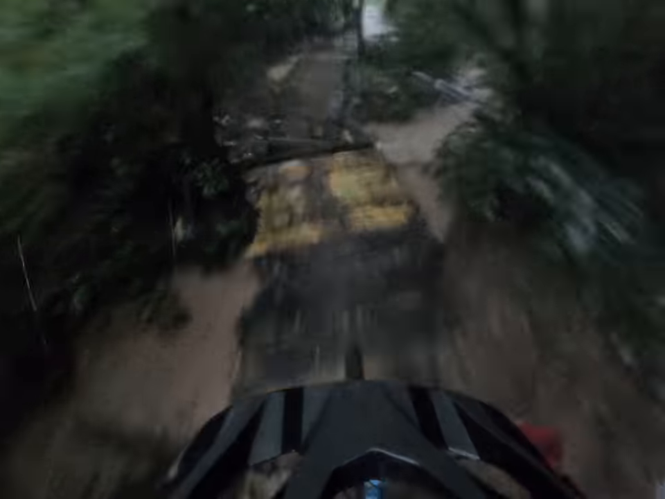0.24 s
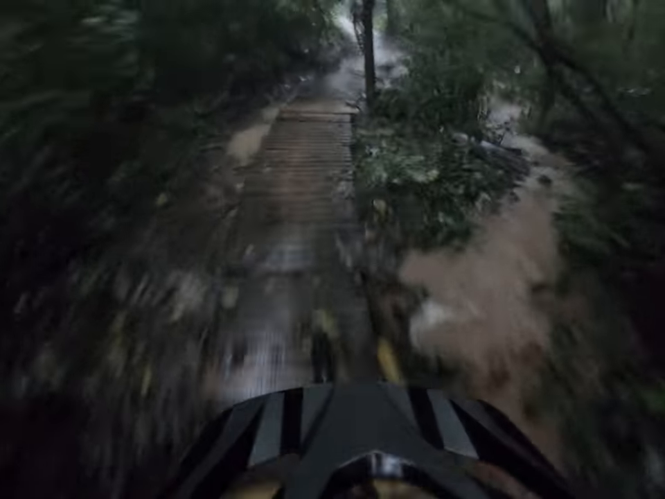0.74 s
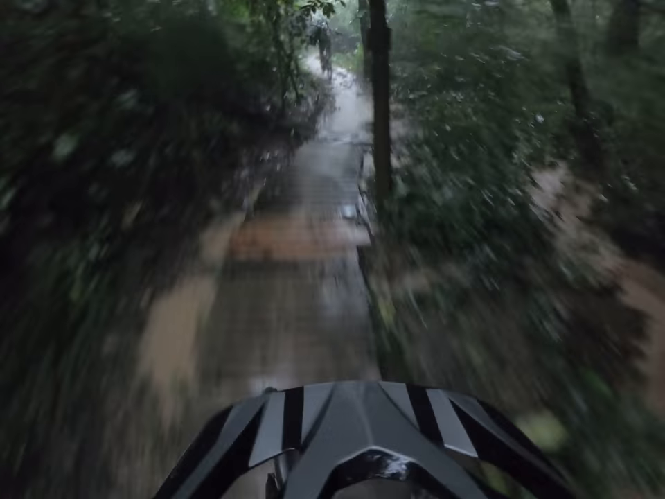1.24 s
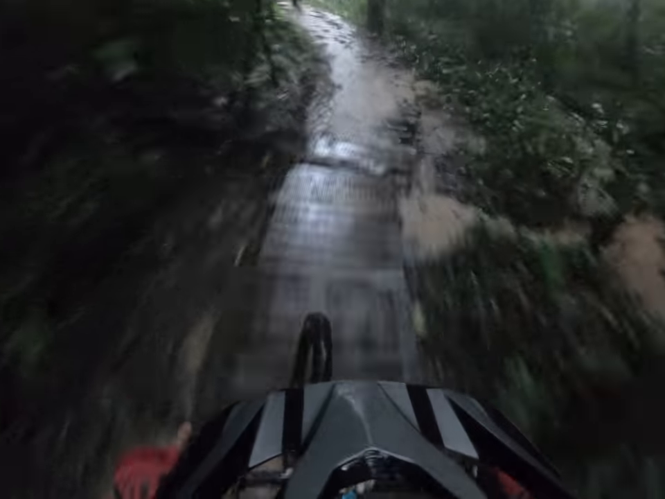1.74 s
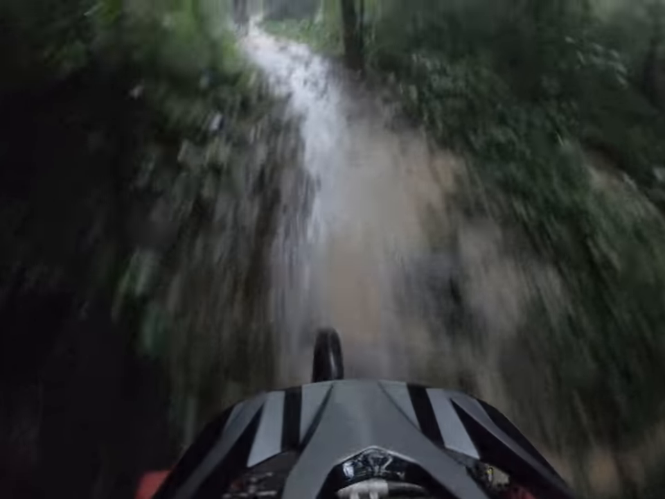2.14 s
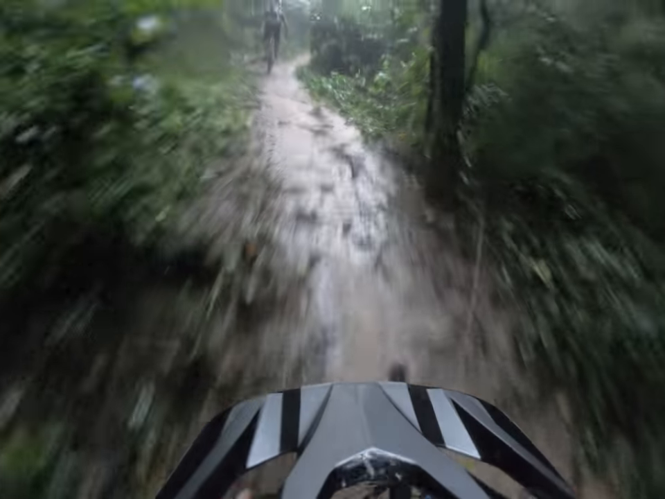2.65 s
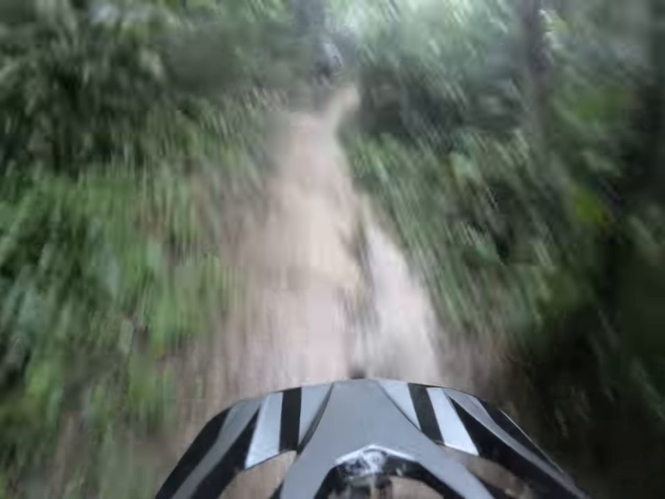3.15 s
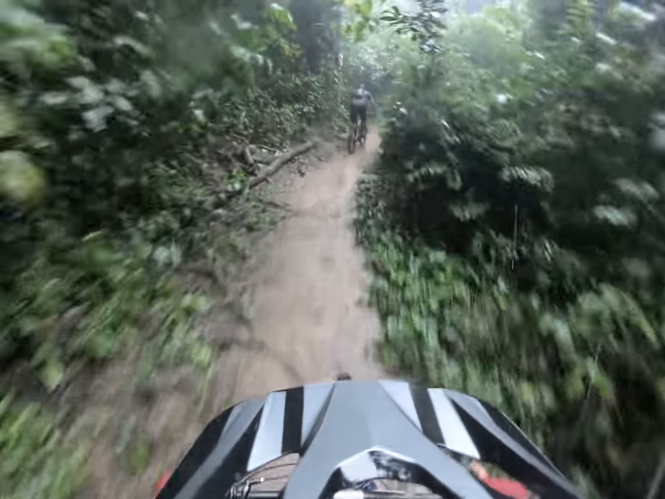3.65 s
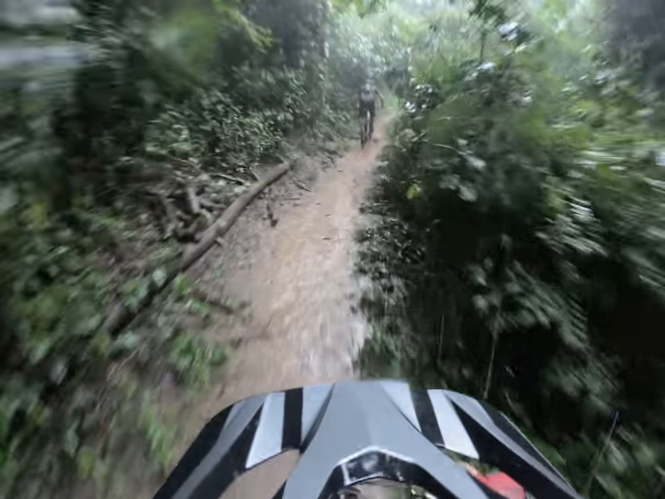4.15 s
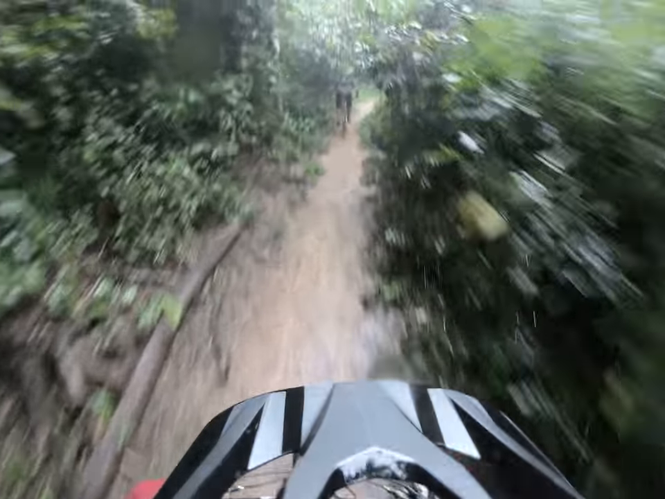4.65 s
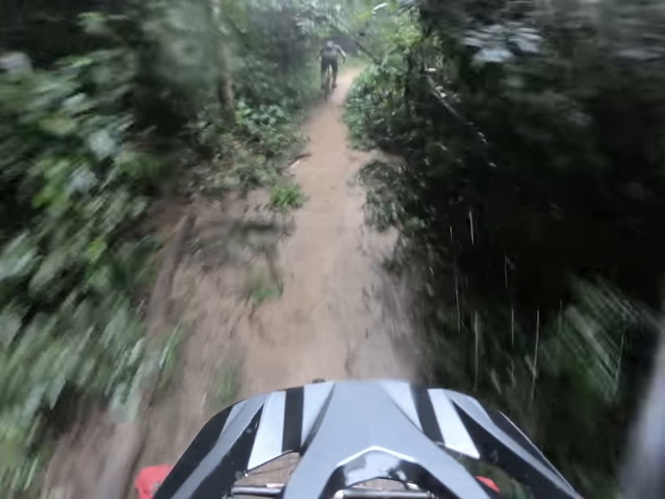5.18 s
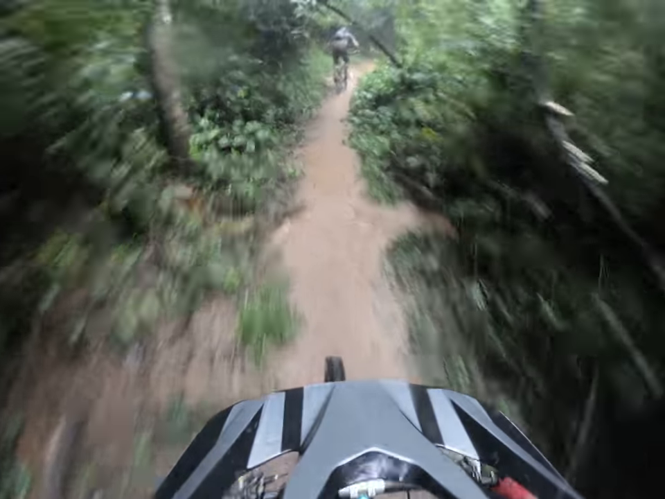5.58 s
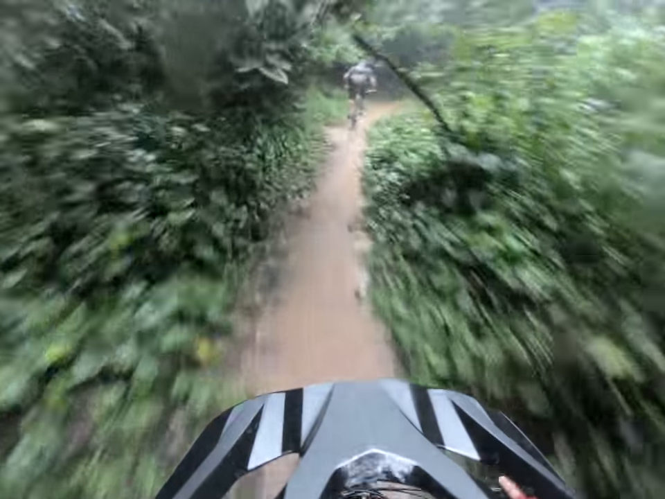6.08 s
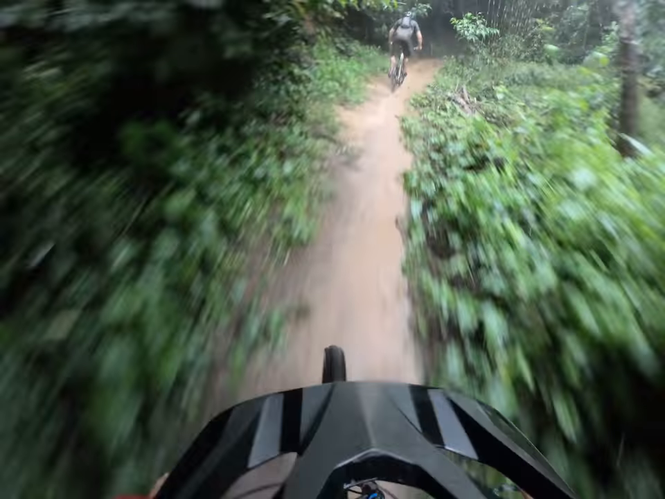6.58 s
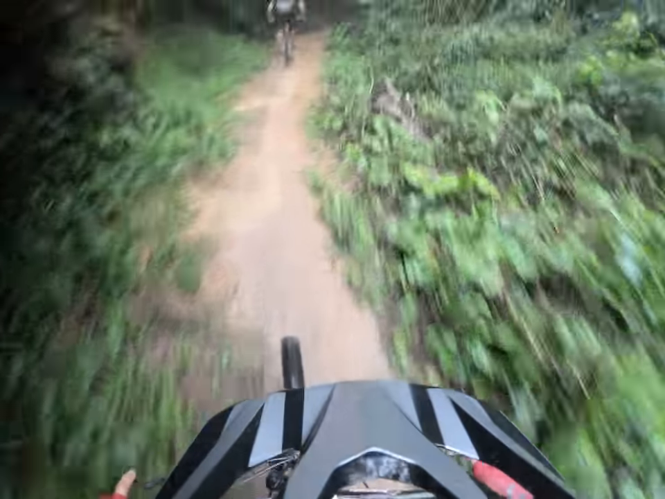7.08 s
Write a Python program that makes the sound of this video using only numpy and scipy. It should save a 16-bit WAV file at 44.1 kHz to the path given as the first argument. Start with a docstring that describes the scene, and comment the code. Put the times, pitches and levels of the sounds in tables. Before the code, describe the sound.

Rain and mud spray patter hard and close on a sealed camera housing while a bicycle thumps and knocks along a wet forest trail.

```python
"""A forest trail in a downpour, heard by a sealed helmet camera on a ridden bicycle.
Drops and mud spray tap the housing: rough noise pushes ring its damped modes, filtered bursts crack.
Bumps, knocks and brief high tones are decaying sines; wind is noise in low helmet and mount resonances.
Far rain hisses as fine ticks over a noise wash, and a wet part of the bike squeaks in wavering sines."""
import sys
import numpy as np
from scipy import signal
from scipy.fft import rfft, irfft
from scipy.io import wavfile
from scipy.ndimage import uniform_filter1d, map_coordinates

SR = 44100
rng = np.random.default_rng(int(sys.argv[2]) if len(sys.argv) > 2 else 0)


def wav_out(sig):
    """Save sig, one row per channel (or a flat mono array), as 16-bit PCM at SR to the path in sys.argv[1]."""
    wavfile.write(sys.argv[1], SR, np.round(np.clip(np.atleast_2d(sig).T, -1, 1) * 32767).astype(np.int16))


N = 322812
T = np.arange(N) / SR
TAP = np.arange(1024) / SR  # clock of one short sound, s

# Spray thickness, which also steers the far rain: (time [s], level before boost and drop size [dB])
SPRAY_LEVEL = [(0.0, -47.5), (0.85, -42), (1.24, -50), (1.69, -41.5), (2.06, -52), (2.91, -50.5),
               (3.28, -46.5), (3.83, -48.5), (4.22, -44.5), (4.38, -52), (5.07, -50), (5.71, -40.5),
               (6.01, -41.5), (6.4, -48.5), (6.81, -41), (7.16, -43), (7.32, -40.5)]


def undb(db):
    """Decibels to gain."""
    return 10 ** (np.asarray(db) / 20)


def level(x, db):
    """Scale to an rms level."""
    return x * undb(db) / np.sqrt(np.mean(x ** 2))


def peak(rows):
    """Scale each row to peak 1."""
    return rows / np.abs(rows).max(axis=1, keepdims=True)


def decay(t, t60):
    """Exponential fall of 60 dB in t60."""
    return np.exp(-np.log(1000) * t / t60)


def place(s, rows):
    """Mix one short sound per row in at its time."""
    at = (np.asarray(s) * SR).astype(int)[:, None] + np.arange(rows.shape[1])
    return np.bincount(at.ravel(), rows.ravel(), N + SR)[:N]


def walk(rate):
    """Random levels held 1 / rate s, then slewed twice into a smooth drift; spread near 2."""
    k = int(SR / rate)
    held = np.repeat(rng.standard_normal(N // k + 1), k)
    return 2.84 * uniform_filter1d(uniform_filter1d(held, k), k)[:N]


def band(hz, width_hz):
    """Noise through one resonance twice, rms 1."""
    b, a = signal.iirpeak(hz, hz / width_hz, fs=SR)
    once = signal.lfilter(b, a, rng.standard_normal(N))
    return level(signal.lfilter(b, a, once), 0)


def port(x):
    """Sound through the sealed port: a causal filter from the cepstrum of its log gain."""
    # Colour of the port: (frequency [Hz], gain [dB])
    port_colour = [(88, -32.5), (150, 1.5), (298, -2), (860, -7), (1270, -10.5), (1580, -0.5),
                   (2160, -14.5), (3020, -20), (4130, -13.5), (6490, -30.5), (8540, -40), (11000, -58),
                   (12600, -41.5), (16300, -63)]
    hz, db = np.transpose(port_colour)
    bins_hz = np.arange(1025) * SR / 2048
    gain_db = np.interp(np.log(bins_hz + 1), np.log(hz), db)
    cepstrum = irfft(np.log(undb(gain_db)))
    # folding the cepstrum forward in time makes the filter minimum phase
    cepstrum[1:1024] *= 2
    cepstrum[1025:] = 0
    response = irfft(np.exp(rfft(cepstrum)))
    return signal.fftconvolve(x, response[None], axes=1)[:, :x.shape[1]]


def hiss(ticks_per_s=500, scatter_db=9.0, wash_db=-3, hiss_db=-42.5, follow=0.46):
    """Rain in the leaves: a fine crackle over a wash, louder where the spray is thicker."""
    spray_db = np.interp(T, *np.transpose(SPRAY_LEVEL))
    ticks = (rng.random(N) < ticks_per_s / SR) * undb(scatter_db * rng.standard_normal(N))
    ticks = uniform_filter1d(ticks, size=48) * rng.standard_normal(N)  # each tick lasts about a millisecond
    noise = level(ticks, 0) + undb(wash_db) * rng.standard_normal(N)
    steady = level(port(noise[None])[0], hiss_db)
    swell_db = follow * (spray_db - spray_db.mean()) + .8 * walk(60)
    return steady * undb(swell_db)


def wind():
    """Turbulence buffets the low resonances of helmet and mount, each with its own gusts."""
    # Wind strength: (time [s], helmet shell level before gusts [dB], camera mount level before gusts [dB])
    wind_level = [(0.0, -33.5, -50), (0.51, -31, -46), (1.02, -35, -49.5), (1.57, -33.5, -35.5),
                  (1.89, -31, -69), (2.18, -33, -53), (2.95, -46.5, -66), (3.28, -28, -42),
                  (3.67, -42, -71.5), (4.3, -38, -38.5), (4.45, -38, -53.5), (5.16, -29.5, -49),
                  (5.61, -44, -39.5), (5.99, -38.5, -50), (6.28, -31.5, -52), (6.6, -34.5, -38),
                  (6.85, -33, -41), (7.32, -43, -65)]
    # Helmet shell resonances: (frequency [Hz], width of each filter pass [Hz], level before gusts [dB])
    shell_modes = [(27.6, 9.7, -0.22), (46.8, 36, -1.3)]
    s, shell_db, mount_db = np.transpose(wind_level)
    shell = sum(undb(db + 1.95 * walk(6.8)) * band(hz, width) for hz, width, db in shell_modes)
    shell = undb(np.interp(T, s, shell_db)) * shell
    mount_gusts_db = 6.2 * np.tanh(walk(25))
    mount = undb(np.interp(T, s, mount_db) + mount_gusts_db) * band(hz=144, width_hz=69)
    shell_gusts_db = 4.0 * np.tanh(walk(10))
    return undb(shell_gusts_db) * shell + mount


def squeaks(stutter_db=3):
    """Thin unsteady tones of rubbing metal that waver in pitch, stutter and fade."""
    # Squeaks: (start [s], end [s], centre pitch [Hz], level before stutter [dB])
    squeak_notes = [(1.416, 1.604, 7900, -64.5), (4.24, 4.3, 5250, -70), (5.167, 5.534, 5900, -61.5),
                    (5.17, 5.59, 5020, -62.5)]
    out = 0
    for start, end, hz, db in squeak_notes:
        length = end - start
        gate = np.interp(T, [start, start + 0.043 * length, end - 0.1 * length, end], [0, 1, 1, 0])
        waver = 1 + .003 * walk(30) + .008 * walk(600)  # a slow drift and a rough flutter
        tone = np.sin(2 * np.pi * np.cumsum(hz * waver) / SR)
        tone_db = db + stutter_db * np.tanh(walk(40)) + 4 * walk(300)
        out = out + gate * undb(tone_db) * tone
    return out


def high_tones(t60_s=0.028, rise_s=0.00022):
    """Short high tones near 4 kHz, each at its own pitch, with a quick rise and fade."""
    # High tones: (time [s], peak [dB], pitch [Hz])
    tone_notes = [(0.571, -28.5, 4600), (1.594, -24, 4400), (1.832, -19, 4020), (1.857, -25.5, 4300),
                  (1.974, -26, 4070), (1.984, -15.5, 4350), (2.517, -30, 4100), (3.439, -34, 4100),
                  (4.16, -25, 4030), (4.226, -29, 4050), (4.304, -25, 4050), (6.207, -22.5, 4150)]
    s, db, hz = np.array(tone_notes).T[:, :, None]
    onset = 1 - np.exp(-TAP / rise_s)
    fade = 1 - TAP / TAP[-1]  # a straight fade on top of the decay, ending in silence
    rows = np.sin(2 * np.pi * hz * TAP) * decay(TAP, t60_s) * onset * fade
    return place(s[:, 0], undb(db) * peak(rows))


def bumps():
    """Each jolt rocks the helmet at a low pitch that sags at the onset, and knocks the mount."""
    # Bumps through the helmet: (time [s], peak [dB], settled pitch [Hz], 60 dB decay [s])
    jolts = [(0.217, -13.5, 42.7, 0.026), (0.316, -27, 59.5, 0.45), (0.548, -26, 55.5, 0.45),
             (0.77, -22.5, 58.6, 0.083), (1.49, -10, 56.8, 0.22), (1.82, -12.5, 54.4, 0.21),
             (1.978, -8.5, 46.5, 0.25), (2.639, -21.5, 40.7, 0.12), (3.118, -8.5, 50.5, 0.2),
             (3.278, -14, 45, 0.14), (6.08, -14.5, 59, 0.25), (6.177, -21, 49.4, 0.13),
             (6.245, -16, 46.3, 0.23), (6.365, -18.5, 39, 0.18), (6.948, -10.5, 59.5, 0.15),
             (7.018, -12.5, 42.7, 0.14), (7.272, -15.5, 52.7, 0.13)]
    s, db, hz, t60 = np.array(jolts).T[:, :, None]
    t = np.arange(SR // 2) / SR
    turns = hz * (t + 0.0051 * (1 - np.exp(-t / 0.0026)))
    helmet = np.sin(2 * np.pi * turns)
    mount = 0.31 * np.sin(2 * np.pi * 128 * t) * np.exp(-t / 0.099)
    onset = 1 - np.exp(-t / 0.0035)
    rows = (helmet + mount) * decay(t, t60) * onset
    return place(s[:, 0], undb(db) * peak(rows))


def knocks(cycles=7):
    """A soft blow sets one low shell mode going; it falls 60 dB in a few cycles."""
    # Dull knocks of the helmet shell: (time [s], peak [dB], pitch [Hz])
    blows = [(0.195, -16, 466), (0.969, -22, 312), (1.524, -24.5, 490), (3.118, -17.5, 266),
             (3.435, -21, 276), (3.437, -21, 120), (4.76, -25, 138), (5.544, -26, 156), (5.715, -22, 204),
             (6.518, -21, 358), (6.861, -27.5, 221), (6.941, -20, 350), (7.275, -17.5, 407)]
    s, db, hz = np.array(blows).T[:, :, None]
    turns = hz * np.arange(SR // 10) / SR
    onset = 1 - np.exp(-turns / 0.39)
    rows = np.sin(2 * np.pi * turns) * decay(turns, cycles) * onset
    return place(s[:, 0], undb(db) * peak(rows))


def ring(modes, gain_db, push, scatter_db, top_hz, detune=.04, bend=0.067):
    """A rough push rings modes of random strength; water on the wall shifts and bends their pitch."""
    hz, t60, db = np.transpose(modes)
    shapes = np.exp(np.outer(2j * np.pi * hz - np.log(1000) / t60, TAP)).imag
    # a small soft drop drives the wall over a limited range
    drive = signal.butter(4, [400, top_hz], "band", fs=SR, output="sos")
    shapes = signal.sosfilt(drive, shapes)
    gains = undb(db + gain_db + scatter_db * rng.standard_normal((len(push), len(hz))))
    # reading the ring with a stretched clock moves its pitch
    shift, glide = rng.standard_normal((len(push), 2)).T[:, :, None]
    stretch = 1 + detune * shift + bend * glide * np.tanh(TAP / 0.0068)
    clock = np.clip(TAP * stretch * SR, 0, len(TAP) - 1)
    row = np.arange(len(push))[:, None] + 0 * clock
    rung = map_coordinates(gains @ shapes, [row, clock], order=1)
    return peak(signal.fftconvolve(rung, push, axes=1)[:, :len(TAP)])


def taps(s, peak_db, spot_hz, upper_db, crack_db, reach_oct=0.17, far_db=-12):
    """A drop flattens, a dull one more slowly, rings most the modes near its spot's pitch, and cracks."""
    # Housing modes, low and high: (frequency [Hz], 60 dB decay [s], strength before scatter [dB])
    low_modes = [(480, 0.08, -16.5), (807, 0.026, -2), (912, 0.028, 1.5), (1121, 0.014, 10),
                 (1535, 0.015, 12.5), (1753, 0.012, 7.5), (2028, 0.017, 7.5)]
    high_modes = [(3656, 0.013, 9.5), (4083, 0.031, 3.5), (4610, 0.012, -15.5), (5930, 0.015, -11.5)]
    push, burst = rng.standard_normal((len(s), 2, len(TAP))).transpose(1, 0, 2)

    dullness_db = -.35 * np.clip(upper_db + 22, -25, 5)
    spread_s = .00045 * 2 ** (.4 * rng.standard_normal((len(s), 1))) * undb(dullness_db)[:, None]
    flattening = (TAP / spread_s) ** 2 * np.exp(-TAP / spread_s)
    push = push * (flattening + 0.066 * np.exp(-TAP / 0.0067))

    octaves = np.log2(np.array(low_modes)[:, 0] / spot_hz[:, None])
    spot_gain_db = far_db * (1 - np.exp(-(octaves / reach_oct) ** 2))
    low = ring(low_modes, spot_gain_db, push, scatter_db=4.0, top_hz=2358)
    high = ring(high_modes, 0, push, scatter_db=11.5, top_hz=5930)
    both = low + undb(upper_db)[:, None] * high

    burst = burst * ((TAP / 0.00059) ** 2 * np.exp(-TAP / 0.00028) + 0.021 * np.exp(-TAP / 0.0047))
    treble = signal.butter(4, 5600, "high", fs=SR, output="sos")
    crack = signal.sosfilt(treble, port(burst))
    cracks = place(np.clip(s + .0003, 0, None), undb(peak_db + crack_db)[:, None] * peak(crack))

    # s marks the moment just before the low ring is loudest
    ring_s = s + 0.001384 - np.abs(low).argmax(axis=1) / SR
    return place(np.clip(ring_s, 0, None), undb(peak_db)[:, None] * both) + cracks


def small_taps(s, peak_db, bright_db):
    """Taps on random spots, each with its own brightness."""
    spot, upper, crack = rng.standard_normal((len(s), 3)).T
    spot_hz = np.clip(1250 * 2 ** (0.59 * spot), 300, 2500)
    upper_db = bright_db - 28.0 + 10.4 * np.clip(upper, -2, 1)
    crack_db = bright_db - 21 + 6 * np.clip(crack, -2, 1)
    return taps(s, peak_db, spot_hz, upper_db, crack_db)


def spray(per_s=140, size_db=7.0, boost_db=4):
    """Many small drops tap at random moments; a few are far bigger than the rest."""
    when, big = rng.random((int(per_s * N / SR), 2)).T
    s = when * N / SR
    bigger_db = -size_db * np.log(np.clip(big, .08, 1))
    return small_taps(s, np.interp(s, *np.transpose(SPRAY_LEVEL)) + boost_db + bigger_db, 0)


def splashes(count=20, fade_db=6):
    """Mud and water land as ragged volleys of taps that weaken towards their end."""
    # Splashes: (start [s], end [s], strongest possible tap [dB], brightness offset [dB])
    volleys = [(.212, .24, -13.5, 9), (1.975, 2.02, -15, 14), (3.1, 3.135, -14, -4.5),
               (5.505, 5.56, -18, 0), (5.905, 5.94, -19.5, 11.5), (6.2, 6.22, -17.5, 8),
               (7.26, 7.295, -17.5, -20)]
    start, end, db, bright_db = np.repeat(volleys, count, axis=0).T
    when, big = rng.random((len(start), 2)).T
    return small_taps(start + when * (end - start), db - 12 * big - fade_db * when, bright_db)


def drops():
    """The sharper a big drop lands, the more it wakes the upper modes and the louder it cracks."""
    # Big drops: (time [s], low ring peak [dB], pitch of the struck spot [Hz], sharpness [dB])
    big_drops = [(0.03, -13, 1650, -17.5), (0.158, -18, 1390, -37), (0.217, -17, 1650, -14),
                 (0.263, -10, 1550, -36), (0.28, -14.5, 606, -52), (0.331, -11.5, 1770, -24),
                 (0.362, -10, 1580, -28.5), (0.561, -15, 896, -19.5), (0.608, -17, 896, -26),
                 (0.647, -6.5, 1100, -28), (0.689, -15, 795, -49), (0.775, -15, 1376, -15),
                 (0.804, -14.5, 1310, -27), (0.844, -16, 1450, -33), (0.886, -25, 1800, -14.5),
                 (0.976, -15, 1390, -39), (1.11, -12.5, 1530, -29), (1.261, -7.5, 1400, -30.5),
                 (1.372, -14.5, 1810, -22), (1.418, -15, 1160, -22.5), (1.444, -5.5, 1900, -22),
                 (1.527, -6.5, 786, -44), (1.597, -14.5, 1767, -19.5), (1.562, -30, 1500, -13),
                 (1.67, -21, 504, -47), (1.785, -26, 1236, -13), (1.831, -9.5, 1740, -19),
                 (1.859, -13, 1820, -18), (1.895, -10.5, 890, -33), (1.976, -8.5, 1770, -33),
                 (1.985, -16.5, 1140, -22), (1.991, -9, 1640, -45), (2.011, -12, 1050, -39),
                 (2.051, -22.5, 1780, -28), (2.134, -19, 1770, -17.5), (2.18, -16, 1550, -27),
                 (2.205, -17, 930, -18.5), (2.268, -14, 1240, -34), (2.301, -11.5, 1470, -32),
                 (2.368, -10.5, 1070, -33), (2.517, -9.5, 1130, -14.5), (2.564, -19, 770, -52),
                 (2.634, -7.5, 1180, -28.5), (2.647, -10.5, 770, -33), (2.66, -8.5, 1110, -30),
                 (2.73, -21.5, 1760, -11.5), (2.941, -9.5, 1500, -29), (3.11, -18.5, 825, -37),
                 (3.116, -15, 600, -27), (3.234, -17.5, 1520, -26), (3.252, -17.5, 1020, -27),
                 (3.278, -14.5, 905, -47), (3.34, -17.5, 784, -30), (3.377, -16.5, 1720, -26),
                 (3.415, -15, 1450, -27.5), (3.44, -4.5, 1750, -24.5), (3.49, -11.5, 890, -21.5),
                 (3.53, -10, 1510, -32.5), (3.591, -7, 1520, -37), (3.601, -13, 1730, -20.5),
                 (3.807, -11.5, 1460, -32), (3.869, -13.5, 1770, -34), (3.975, -10.5, 1380, -31.5),
                 (4.033, -17, 1550, -39), (4.072, -14.5, 1490, -27), (4.091, -11, 1410, -32),
                 (4.162, -11, 1980, -25.5), (4.204, -20, 1500, -26), (4.217, -16, 1500, -27),
                 (4.237, -11.5, 1410, -18), (4.288, -8.5, 1250, -33), (4.304, -7, 1190, -24.5),
                 (4.312, -12.5, 1480, -28), (4.324, -17, 1200, -28), (4.392, -17, 1990, -20),
                 (4.75, -18.5, 1880, -47), (4.763, -7.5, 920, -34), (4.818, -18.5, 860, -20.5),
                 (4.947, -18, 1680, -26), (5.072, -19, 1490, -40), (5.145, -15, 1600, -32),
                 (5.158, -15.5, 1700, -22.5), (5.165, -20.5, 1500, -24), (5.207, -3.5, 1510, -27.5),
                 (5.282, -17, 796, -22.5), (5.344, -11.5, 1780, -29), (5.369, -18, 1600, -36),
                 (5.447, -23, 1670, -37), (5.57, -16, 912, -28), (5.585, -16.5, 1500, -24),
                 (5.646, -9, 1690, -26.5), (5.686, -12, 930, -26.5), (5.692, -13.5, 1180, -27),
                 (5.707, -16, 1330, -24), (5.72, -9, 474, -23.5), (5.73, -12.5, 900, -29),
                 (5.746, -16, 900, -36), (5.766, -15, 790, -61), (5.824, -16.5, 1190, -33),
                 (5.844, -19.5, 1400, -24), (5.908, -7.5, 735, -18), (5.931, -14.5, 2030, -15),
                 (5.991, -19, 1558, -24), (6.104, -9, 1780, -26.5), (6.164, -11.5, 820, -63),
                 (6.213, -7, 985, -23.5), (6.492, -20, 1920, -23), (6.551, -13.5, 1300, -25),
                 (6.608, -16.5, 890, -50), (6.666, -8, 1500, -27.5), (6.717, -16.5, 1920, -18.5),
                 (6.769, -12, 1630, -27), (6.782, -14.5, 1500, -17), (6.821, -10, 1880, -32),
                 (6.852, -12.5, 815, -45), (6.865, -7.5, 900, -43), (6.921, -12.5, 900, -50),
                 (6.952, -8.5, 970, -26.5), (7.061, -11.5, 840, -37), (7.173, -17, 1250, -24),
                 (7.184, -18.5, 1300, -34), (7.22, -20.5, 1500, -26), (7.267, -11, 1870, -16.5),
                 (7.279, -9.5, 1030, -21.5), (7.31, -16, 1730, -17)]
    s, db, hz, sharp_db = np.transpose(big_drops)
    # both relative to the low ring's peak
    upper_db = 2.5 + 0.76 * sharp_db
    crack_db = 16 + 1.444 * sharp_db
    return taps(s, db, hz, upper_db, crack_db)


def scene():
    """All sources reach one capsule."""
    struck = drops() + spray() + splashes() + knocks() + high_tones() + bumps()
    return (struck + wind() + hiss() + squeaks())[None]


def record(dry):
    """The camera cuts the deepest bass and the top."""
    dry = signal.sosfilt(signal.butter(2, 17, "high", fs=SR, output="sos"), dry)
    return signal.sosfilt(signal.ellip(8, .2, 70, 16100, fs=SR, output="sos"), dry)


dry = scene()
out = record(dry)
wav_out(out)
```